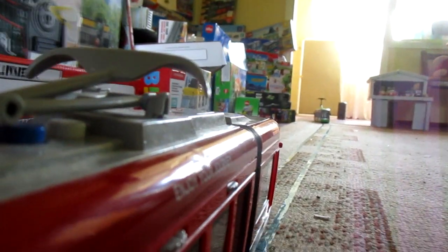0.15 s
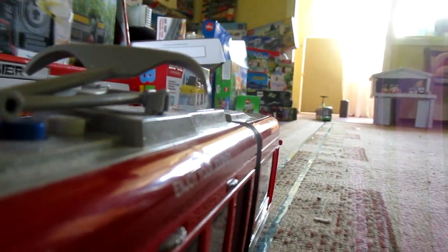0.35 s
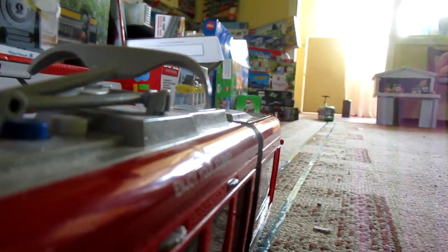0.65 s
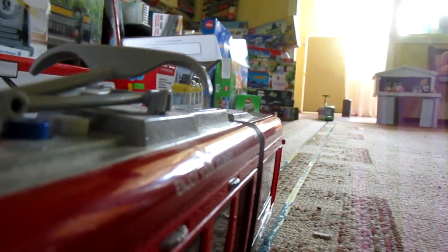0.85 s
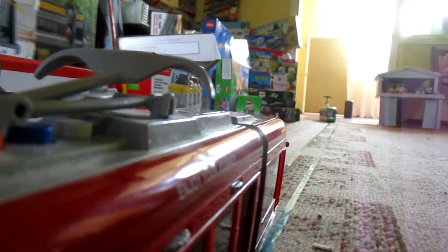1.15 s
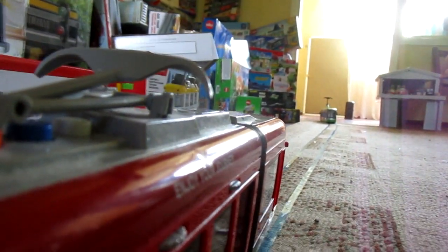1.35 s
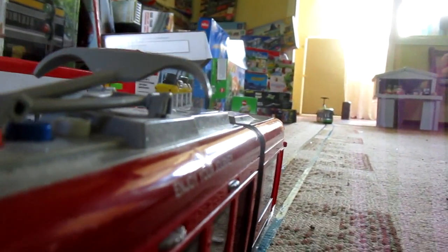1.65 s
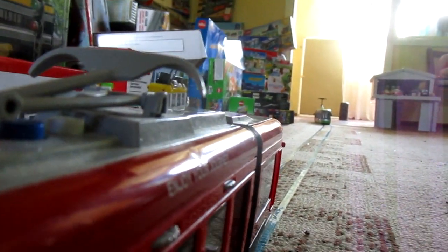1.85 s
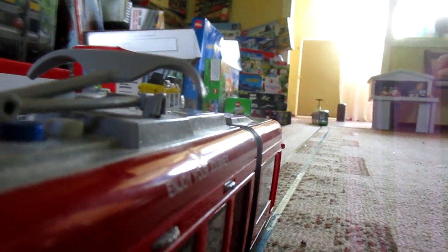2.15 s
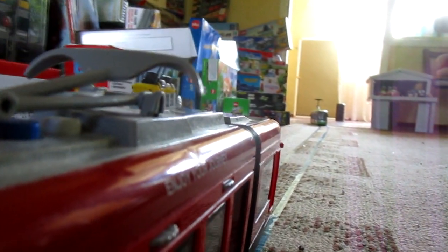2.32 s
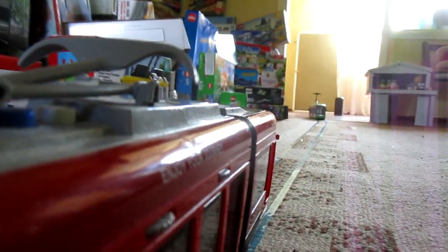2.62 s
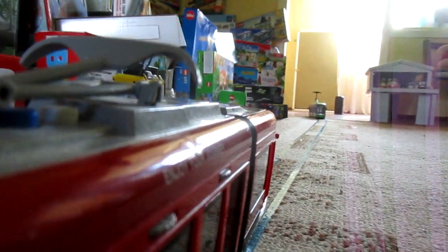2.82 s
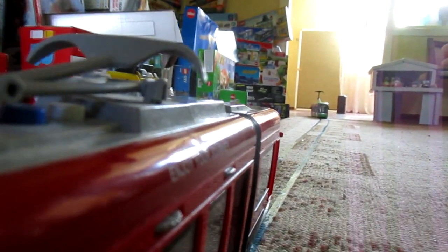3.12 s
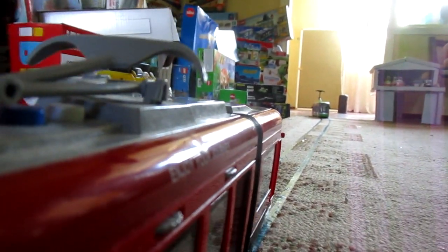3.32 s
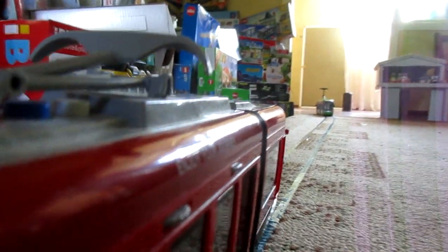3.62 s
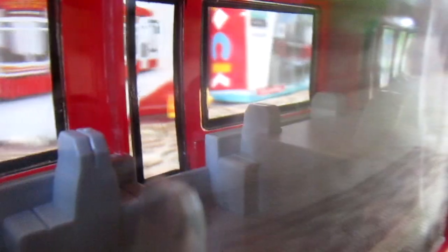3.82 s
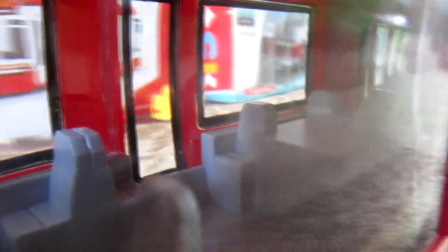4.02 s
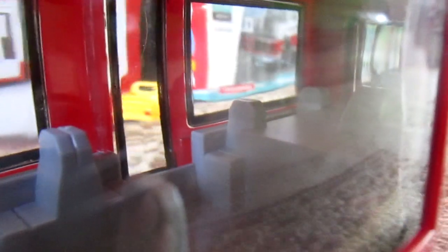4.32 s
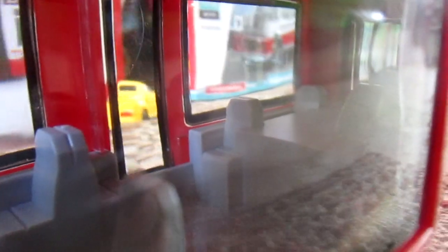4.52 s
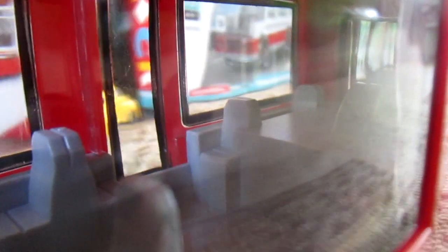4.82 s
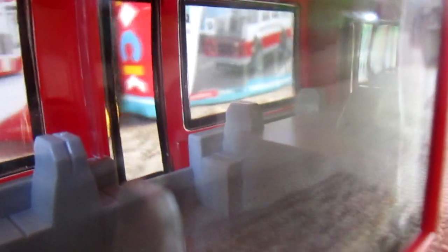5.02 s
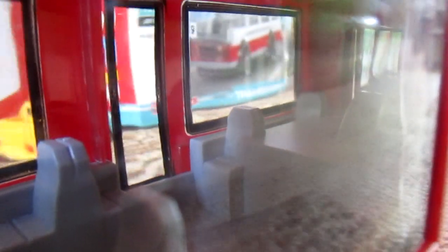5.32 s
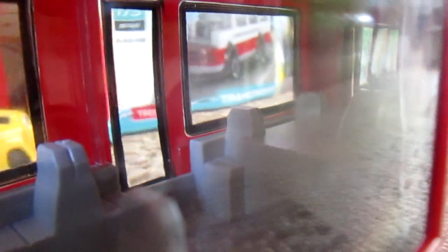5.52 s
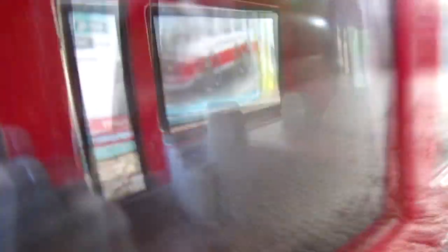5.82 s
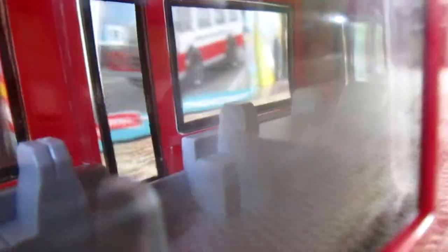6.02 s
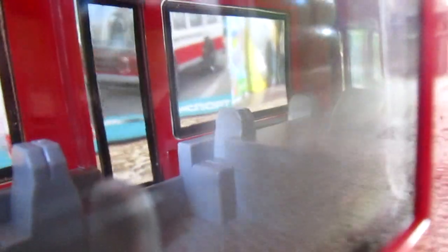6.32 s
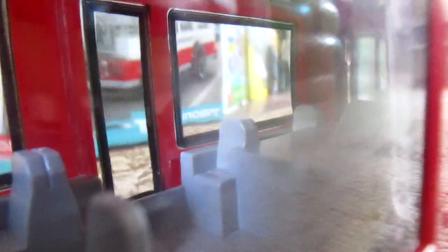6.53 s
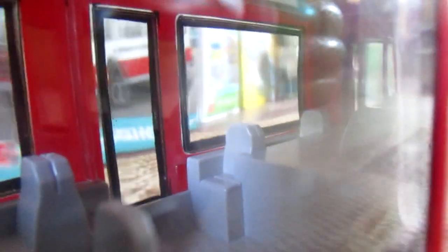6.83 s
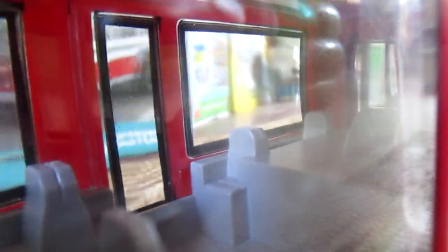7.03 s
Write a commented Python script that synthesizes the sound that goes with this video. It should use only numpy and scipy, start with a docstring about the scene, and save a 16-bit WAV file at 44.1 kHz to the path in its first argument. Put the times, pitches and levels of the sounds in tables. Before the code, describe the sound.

Gritty small-motor whirring winds down with light wheel knocks, cuts to silence, then returns closer and hollower, rising in pitch amid hard plastic snaps.

```python
"""Battery toy tram on its track

A toy tram runs along its track on a playroom carpet, heard from its roof, then, after a short silence, from inside.
The motor scrapes once a turn, rings the gearbox and whines with overtones of its shaft, all louder at speed.
Gritty rolling rings the plastic shell, a low rumble lies below, and wheels knock on the rails as decaying tones.
Loose plastic snaps as short noise cracks, the body bumps and swings against the microphone riding on it,
and plastic rubs once with a gritty noise. A faint hiss lies under both rides, and the gain drops after loud blows."""
import sys
import numpy as np
from scipy import signal
from scipy.fft import rfft, irfft
from scipy.io import wavfile
from scipy.ndimage import map_coordinates

SR = 44100
rng = np.random.default_rng(int(sys.argv[2]) if len(sys.argv) > 2 else 0)


def dump_mix(stems):
    """Bounce the given channels to the path in sys.argv[1] as a 16-bit WAV at rate SR."""
    frames = np.atleast_2d(stems).T  # one column per channel
    limited = np.clip(frames, -1, 1)  # hard clip at full scale
    pcm = np.round(limited * 32767).astype(np.int16)
    wavfile.write(sys.argv[1], SR, pcm)


N = 315752
T = np.arange(N) / SR  # time of each sample [s]
AXLE_TEETH = 8  # the motor shaft turns this many times per turn of the axle

# colour of the plastic shell heard from the roof: (frequency [Hz], level [dB])
ROOF_SHELL = [(150, -32), (250, -7.5), (323, 0), (417, -3.5), (573, -0.5), (731, -8.5), (835, -3.5),
              (932, -10.5), (1380, -3.5), (1890, -10), (2470, -4), (2630, -5), (2900, -20.5), (4280, -20),
              (4600, -28), (5980, -54), (10100, -120)]
# colour of the plastic shell heard from inside: (frequency [Hz], level [dB])
CABIN_SHELL = [(150, -49), (250, -3.5), (438, -4), (477, -5), (573, 4.5), (624, -3), (796, -12.5),
               (1020, -7.5), (1260, -11), (1450, -2), (1800, -17), (2440, -4.5), (3110, -19), (3830, -14),
               (4600, -38), (5980, -56), (10100, -120)]


def roof():
    """From the roof: slow, distinct gear ticks and a thin whine as the tram winds down."""
    # motor speed, cruising and then winding down: (time [s], speed [shaft turns per second])
    spin = [(0.0, 111), (0.2, 113), (0.79, 100.0), (0.99, 100), (1.33, 109), (1.44, 109), (1.92, 92.2),
            (2.57, 91.4), (2.74, 83.9), (3.33, 47.6), (3.46, 44.6), (3.57, 44.2)]
    # broad colour of the motor scrape: (frequency [Hz], level [dB])
    motor_colour = [(1880, -38), (3200, -8), (4300, -14), (4570, -20), (4860, -50.5), (5160, -12.5),
                    (6110, -0.5), (6990, -6), (7730, -2.5), (8160, 5), (9460, -9), (10400, -7),
                    (12900, -21.5), (14500, -9), (16000, -28)]
    # narrow resonances of the gearbox: (frequency [Hz], width [Hz], level [dB])
    gear_modes = [(5910, 63, -37), (6460, 89, 4.5), (7950, 87, -3), (7500, 40, 1), (8740, 40, 7.5),
                  (9500, 240, 7.5), (9570, 130, -23), (10750, 270, 10.5), (12300, 620, 12.5),
                  (13560, 170, -13.5)]
    # bands that surge once per axle turn: (frequency [Hz], width [Hz], swing [dB], strongest at [gear tooth])
    surge_bands = [(6200, 600, 6.5, 3.2), (7800, 800, 3.5, 0.65), (14000, 2000, 4.5, 3.5)]
    # overtones of the motor whine: (multiple of the shaft rate [-], level [dB])
    overtones = [(22, -4), (23, -2.5), (24, -6.5), (25, -6.5), (26, -1.5), (27, -3)]
    cruise_hz = 100  # shaft turns per second
    hz, = curves(spin)
    turns = np.cumsum(hz) / SR

    scrape = motor(turns, decay=.24, rest=.33, load_swing_db=6)
    gears = gearbox(scrape, turns, motor_colour, gear_modes, ring_db=-7.0)
    gears = surge(gears, turns, surge_bands)
    rolling = wheels(hz, ROOF_SHELL, spread_db=1.5, flutter_db=1.)
    tone = unit(colour(whine(hz, overtones), ROOF_SHELL))

    ride = rumble(hz)
    ride += gears * with_speed(hz, cruise_hz, cruise_db=-50.5, doubling_db=11.5)
    ride += rolling * with_speed(hz, cruise_hz, cruise_db=-44.5, doubling_db=2.5)
    ride += tone * with_speed(hz, cruise_hz, cruise_db=-55.5, doubling_db=12)
    return ride


def cabin():
    """From inside: the motor is closer and climbs to a whirr, and the hollow body hums."""
    # motor speed, climbing in two pushes: (time [s], speed [shaft turns per second])
    spin = [(3.93, 138.4), (4.14, 125.6), (4.47, 128.0), (4.68, 146.6), (4.89, 162.0), (4.96, 172.4),
            (5.28, 190.5), (5.64, 191.8), (5.69, 184.3), (6.44, 231.9), (6.59, 228.5), (6.72, 242.7),
            (6.83, 246.9), (7.16, 245.5)]
    # broad colour of the motor scrape: (frequency [Hz], level [dB])
    motor_colour = [(1880, -36), (3200, -19.5), (4000, -6), (4510, -2), (4790, -58), (5270, -2),
                    (5830, -1.5), (6190, 10), (6670, -16), (8500, 1.5), (9920, -0.5), (10800, 1.5),
                    (12000, -10.5), (15000, -3.5), (16000, -9)]
    # narrow resonances of the gearbox: (frequency [Hz], width [Hz], level [dB])
    gear_modes = [(5850, 19, 8), (5960, 19, -21), (6900, 110, 16), (7200, 53, 3), (7390, 50, 11),
                  (7980, 140, 10), (8490, 34, 2.5), (8710, 40, 5.5), (9390, 54, -13), (9800, 79, -8),
                  (10500, 37, 0.5), (12800, 82, 1), (13800, 120, -14), (15200, 130, -13)]
    # bands that surge once per axle turn: (frequency [Hz], width [Hz], swing [dB], strongest at [gear tooth])
    surge_bands = [(7400, 390, 5, 1.3), (8500, 640, 2.6, 3.9)]
    # overtones of the motor whine: (multiple of the shaft rate [-], level [dB])
    overtones = [(2, -4), (6, -1), (7, -2), (8, -1), (9, -4), (10, -1.5), (11, -3), (12, -9), (13, -7),
                 (14, -7), (15, -5), (16, -21), (18, -11), (19, -11)]
    # resonances of the hollow cabin: (frequency [Hz], width [Hz], level [dB])
    air_modes = [(556, 34, 2.5), (590, 35, -1), (1036, 41, -15), (1406, 39, 0.5), (1472, 34, -4),
                 (2500, 51, -17)]
    # overtones favoured by the cabin wall: (frequency [Hz], width [Hz], level [dB])
    wall_modes = [(2360, 520, 4), (3400, 350, 2)]
    cruise_hz = 200  # shaft turns per second
    hz, = curves(spin)
    turns = np.cumsum(hz) / SR

    scrape = motor(turns, decay=.3, rest=.47, load_swing_db=5)
    gears = gearbox(scrape, turns, motor_colour, gear_modes, ring_db=1)
    gears = surge(gears, turns, surge_bands)
    rolling = wheels(hz, CABIN_SHELL, spread_db=1.5, flutter_db=2.5)
    hum = unit(resonate(rng.standard_normal(N), air_modes))
    tone = whine(hz, overtones)
    tone = unit(tone + resonate(tone, wall_modes))

    ride = rumble(hz)
    ride += gears * with_speed(hz, cruise_hz, cruise_db=-44.5, doubling_db=8.5)
    ride += rolling * with_speed(hz, cruise_hz, cruise_db=-41, doubling_db=4.5)
    ride += hum * with_speed(hz, cruise_hz, cruise_db=-47.5, doubling_db=15)
    ride += tone * with_speed(hz, cruise_hz, cruise_db=-49, doubling_db=10.5)
    return ride


def with_speed(hz, cruise_hz, cruise_db, doubling_db):
    """Gain of a running noise: its level at cruising speed, plus a step for each doubling of speed."""
    return undb(cruise_db + doubling_db * np.log2(hz / cruise_hz))


def motor(turns, decay, rest, load_swing_db):
    """The worm scrapes once a turn (decay in turns); the eight-toothed axle gear loads it unevenly."""
    phase, tooth = turns % 1, turns.astype(int)
    burst = (1 - np.exp(-phase / .06)) * np.exp(-phase / decay)
    # the load eases over one turn of the axle, and no two bites are quite alike
    bite_db = rng.standard_normal(tooth[-1] + 1)[tooth]
    load_db = load_swing_db * (.5 - tooth % AXLE_TEETH / AXLE_TEETH) + bite_db
    # the same rough surfaces meet again on every turn of the axle
    axle_place = turns % AXLE_TEETH / AXLE_TEETH
    surface = np.interp(axle_place, np.linspace(0, 1, 4096), rng.standard_normal(4096))
    friction = 1.54 * unit(surface) + rng.standard_normal(N)
    return unit(friction * (unit(burst) + rest) * undb(load_db))


def gearbox(scrape, turns, broad, modes, ring_db):
    """The scrape rings the gearbox; as the axle turns, the contact moves and each resonance swells in its turn."""
    axle = 2 * np.pi * turns / AXLE_TEETH
    body = unit(colour(scrape, broad))
    ring = np.zeros(N)
    for mode in modes:
        swell_db = 3 * np.cos(axle + 2 * np.pi * rng.random())
        ring += resonate(body, [mode]) * undb(swell_db)
    # a second path, half a millisecond longer, slides with the axle and ripples the colour
    lag = SR * (.00051 + .00003 * np.sin(axle))
    second = map_coordinates(body, [np.arange(N) - lag], order=3)
    return unit(unit(body + 0.3 * second) + undb(ring_db) * unit(ring))


def surge(x, turns, bands):
    """Bands of the scrape swell and fade, each at its own point in the turn of the axle."""
    for hz, width, swing_db, tooth in bands:
        gain = undb(swing_db * np.cos(2 * np.pi * (turns - tooth) / AXLE_TEETH))
        x = x + (gain - 1) * resonate(x, [(hz, width, 0)])
    return unit(x)


def whine(hz, overtones):
    """Overtones of the shaft, wavering a little in pitch and strength."""
    waver, flicker_db = .0016, 3  # share of the pitch, strength of each overtone
    turns = np.cumsum(hz * (1 + waver * walk(60))) / SR
    tone = np.zeros(N)
    for multiple, db in overtones:
        gain = undb(db + flicker_db * walk(30))
        tone += gain * np.sin(2 * np.pi * (round(multiple) * turns + rng.random()))
    return unit(tone)


def wheels(hz, shell, spread_db, flutter_db):
    """Rolling grit rings the shell; its lower and upper resonances flutter separately."""
    ring = colour(grit(hz, spread_db, smooth=0.98), shell)
    low = band(ring, 900, "low")
    high = band(ring, 980, "high")
    # the two filters are in opposite phase where they meet, hence the minus
    return unit(low * undb(flutter_db * walk(24)) - high * undb(flutter_db * walk(35)))


def rumble(hz):
    """The whole body trembles on its wheels: low-pitched grit whose level hardly follows the speed."""
    # colour of the trembling: (frequency [Hz], level [dB])
    tremble_colour = [(12, -32), (20, -2.5), (54, 1), (102, 2.5), (140, -2), (173, -0.5), (204, -5.5),
                      (330, -10.5), (430, -29), (730, -120)]
    # loudness of the trembling: (time [s], level [dB])
    tremble_level = [(0, -50.5), (1.5, -48.5), (2.8, -48), (3.5, -48.5), (4.05, -45.5), (4.43, -51.5),
                     (5.1, -45.5), (5.6, -48.5), (7.15, -46.5)]
    level_db, = curves(tremble_level)
    return unit(colour(grit(hz, 3.9, smooth=1.7), tremble_colour)) * undb(level_db)


def grit(hz, spread_db, smooth):
    """Tiny impacts of uneven size, more of them at speed, over a smooth hiss."""
    hits = rng.random(N) < 20 * hz / SR  # about 20 per turn
    size_db = spread_db * np.minimum(rng.exponential(size=N), 4)
    grains = hits * rng.choice([-1, 1], N) * undb(size_db)
    return unit(unit(grains) + smooth * rng.standard_normal(N))


def knocks():
    """The hardest knocks of the wheels on the rails; each wheel drops back once with a weak rebound."""
    # the knocks: (time [s], peak level [dB], bass share [dB], treble share [dB])
    hard_knocks = [(0.134, -26.5, -10, 9), (0.156, -26.5, 24, -5), (0.238, -29, -12, 3),
                   (0.358, -24, 6, -12), (0.493, -27.5, -6, -9), (1.298, -29.5, 1, -5), (1.393, -23, 8, 4),
                   (1.407, -24, 12, 1), (1.817, -24, 8.5, 6), (1.966, -27.5, 12, -5), (2.224, -28, 10, 0),
                   (2.538, -25, 8.5, -7), (2.812, -12, -1.5, -20), (3.052, -32, -1, 1), (3.108, -29, 5, -1),
                   (3.142, -26, 2, -12), (3.235, -26, -5, -13), (3.404, -20, 3, -18.5),
                   (3.937, -26, -2, -4), (4.082, -23, 10, -5), (4.42, -27, 2, -9), (4.547, -27, 5, -7),
                   (5.424, -31, -4, -5), (5.71, -23.5, 11, 15), (6.295, -20.5, 7, -5),
                   (6.864, -21.5, -2, -9)]
    out = np.zeros(N)
    for s, peak_db, bass_db, treble_db in hard_knocks:
        add(out, s, knock(bass_db, treble_db), peak_db)
        rebound_s = s + 0.012 * rng.uniform(0.52, 1.6)
        add(out, rebound_s, knock(bass_db, treble_db), peak_db - 14)
    return out


def jolts():
    """Light knocks at random moments, with random strength."""
    per_s, middle_db, spread_db = 6, -35.5, 8.5  # peak level lies within middle +- spread
    out = np.zeros(N)
    for place, strength in rng.random((int(per_s * N / SR), 2)):
        peak_db = middle_db + spread_db * (2 * strength - 1)
        add(out, place * T[-1], knock(bass_db=6.5, treble_db=-3.5), peak_db)
    return out


def knock(bass_db, treble_db):
    """One knock rings the chassis modes in its own mix, with a short rattle of the shell."""
    # what the chassis rings with: (frequency [Hz], level [dB], time to fall by 60 dB [s])
    chassis_modes = [(482.5, -5.5, 0.084), (633, 2.5, 0.045), (816, -3.5, .035), (1044, 3.5, 0.03),
                     (1242, 9, 0.029), (1493, -6.5, 0.045), (1590, 6, 0.037), (1775, 3, 0.027),
                     (2064, 2, 0.039), (2600, -34, .02), (3300, -16, 0.059)]
    t = T[:SR // 10]
    hz, db, t60 = np.transpose(chassis_modes)[:, :, None]
    detune, strength, polarity = rng.standard_normal((3, len(hz), 1))
    share_db = bass_db * (hz < 950) + treble_db * (hz > 2000)
    gain = np.sign(polarity) * undb(db + 2 * strength + share_db)
    swing = np.sin(2 * np.pi * hz * (1 + .015 * detune) * t)
    ring = np.sum(gain * undb(-60 * t / t60) * swing, axis=0)
    rattle = unit(colour(rng.standard_normal(len(t)), ROOF_SHELL)) * np.exp(-t / 0.0049)
    # a wheel rolls into the joint, so the blow builds up over a moment
    return (ring + 1.5 * rattle) * (1 - np.exp(-t / 0.00041))


def snaps():
    """Hard contacts of loose plastic: a sharp crack of noise that dies within milliseconds."""
    # the snaps: (time [s], peak level [dB], middle share [dB], top share [dB])
    snap_times = [(0.133, -29.5, 26, -6), (0.239, -38, 3, -6), (2.342, -30, -19, 2), (2.8121, -21, 7, -10),
                  (4.062, -24, 6, 6), (4.081, -18, 3, -5), (4.171, -31, -3, -3), (4.9735, -17.5, -2, 9.5),
                  (5.57, -17.5, -6, -8), (5.7334, -3.5, -4, 6), (5.738, -10.5, 19, -10),
                  (5.9346, -8.5, 14.5, -9), (5.9639, -16.5, 4, 12), (6.265, -20.5, 1, -2),
                  (6.374, -17, 6, 12), (6.656, -24, 5, 12), (6.761, -22, 0, 8), (7.09, -25, -5, 7)]
    # colour common to all snaps: (frequency [Hz], level [dB])
    snap_colour = [(400, 7.5), (1400, 1), (2300, 3), (2900, -7), (3600, 4.5), (4400, -7.5), (4850, -14.5),
                   (5500, -9.5), (7500, 0), (10000, -3), (13000, -14.5), (16000, -16.5)]
    out, t = np.zeros(N), T[:SR // 12]
    for s, peak_db, middle_db, top_db in snap_times:
        fade = undb(-60 * t / 0.018)  # falls by 60 dB in 18 ms
        crack = colour(rng.choice([-1, 1], len(t)) * fade, snap_colour)
        tilt = [(200, middle_db), (3500, middle_db), (6000, 0.003), (9500, 0),
                (11500, top_db), (16000, top_db)]
        add(out, s, colour(crack, tilt), peak_db)
    return out


def bumps():
    """Each contact sets off heavily damped swings of the body against the microphone; the shell rattles with it."""
    # the bumps, peak before the last low cut; a heavy contact keeps leaning on the microphone:
    # (time [s], peak level [dB], contact [s], lean [0-1])
    contacts = [(3.953, -31, .008, .5), (4.009, -27, 0.0036, .4), (4.048, -27, 0.0027, 0.2),
                (4.080, -17, 0.0026, .7), (5.7342, 0, .003, 0.12), (5.815, -25, 0.0015, .05),
                (5.8992, -16.5, 0.0022, 0.34), (5.9358, -7, .0045, .95), (6.289, -15, 0.0035, 0.34),
                (6.870, -31.5, 0.0073, .3)]
    # what the body rings with: (frequency [Hz], level [dB], time to fall by 60 dB [s])
    body_modes = [(52, -8.5, 0.06), (120, -11, 0.042), (186, -3, 0.017), (269, 8.5, 0.015), (448, 0, .016),
                  (540, -5, 0.04), (610, -11, 0.029)]
    out, t = np.zeros(N), T[:SR // 8]
    ring = sum(undb(db - 60 * t / t60) * np.cos(2 * np.pi * hz * t) for hz, db, t60 in body_modes)
    for s, peak_db, contact_s, lean in contacts:
        phase = np.pi * np.minimum(t / contact_s, 1)
        # a push-and-pull swing, blended with a one-way push when leaning
        push = (1 - lean) * np.sin(2 * phase) + lean * np.sin(phase)
        rattle = colour(rng.standard_normal(len(t)) * np.exp(-t / 0.0064), CABIN_SHELL)
        add(out, s, signal.fftconvolve(ring, push)[:len(t)], peak_db)
        add(out, s, rattle, peak_db - 15)
    return band(out, hz=39.6, kind="high")


def rub():
    """A brief gritty slide of plastic: it catches hard, then slides on lightly."""
    # colour of the slide: (frequency [Hz], level [dB])
    slide_colour = [(500, -6), (1500, -9), (3600, 4), (4800, -5), (6500, 4.5), (9000, -5), (14000, -9),
                    (16000, -19)]
    start_s, end_s = 6.288, 6.445
    attack_s, release_s, catch_s = 0.014, .025, 0.03
    catch_db, slide_db, flutter_db = -31, -42.5, 0.5
    slide = unit(colour(grit(230, spread_db=1, smooth=0.85), slide_colour))
    age = np.maximum(T - start_s, 0)
    contact = np.clip(np.minimum(age / attack_s, (end_s - T) / release_s), 0, 1)
    force = undb(catch_db) * np.exp(-age / catch_s) + undb(slide_db)
    return slide * contact * force * undb(flutter_db * walk(90))


def hiss():
    """Smooth, faint treble hiss: coloured noise at a steady level."""
    # colour of the hiss: (frequency [Hz], level [dB])
    hiss_colour = [(1760, -32.5), (3000, -9), (4200, -16.5), (4760, -29), (5040, -7), (6570, -3.5),
                   (11000, -6.5), (13400, -13.5), (16000, -27.5)]
    return unit(colour(rng.standard_normal(N), hiss_colour)) * undb(-61)


def undb(db):
    """Decibels to gain."""
    return 10 ** (np.asarray(db) / 20)


def unit(x):
    """Scale to rms 1."""
    return x / np.sqrt(np.mean(x ** 2))


def curves(table):
    """Each column of a table after the time, joined by straight lines."""
    s, *columns = np.transpose(table)
    return [np.interp(T, s, c) for c in columns]


def colour(x, points):
    """Causal filter with the gain of (Hz, dB) points, falling 24 dB per octave beyond their ends."""
    size = 4096
    hz, db = np.transpose(points)
    octave = np.log2(np.maximum(np.arange(size // 2 + 1) * SR / size, 1))
    known = np.log2(hz)
    beyond = np.abs(octave - np.clip(octave, known[0], known[-1]))
    gain_db = np.interp(octave, known, db) - 24 * beyond
    # folding the cepstrum makes the filter respond as early as it can (minimum phase)
    cepstrum = irfft(np.log(undb(gain_db) + 1e-4))
    cepstrum[1:size // 2] *= 2
    cepstrum[size // 2 + 1:] = 0
    response = irfft(np.exp(rfft(cepstrum)))
    return signal.fftconvolve(x, response)[:len(x)]


def band(x, hz, kind):
    """Gentle low-pass or high-pass."""
    return signal.sosfilt(signal.butter(2, hz, kind, fs=SR, output="sos"), x)


def resonate(x, modes):
    """Ring a set of (Hz, width Hz, dB) resonances side by side."""
    out = np.zeros(len(x))
    for hz, width, db in modes:
        b, a = signal.iirpeak(hz, hz / width, fs=SR)
        out += undb(db) * signal.lfilter(b, a, x)
    return out


def walk(rate):
    """Smooth chance, spread a little under 1, changing direction about rate times a second."""
    return np.interp(T * rate, np.arange(2048), rng.standard_normal(2048))


def add(out, s, sound, db):
    """Mix a sound in at time s with the given peak level."""
    i = max(int(s * SR), 0)
    out[i:i + len(sound)] += (sound * undb(db) / np.abs(sound).max())[:N - i]


def heard(start_s, end_s):
    """One inside the span and zero outside, with 3 ms ramps."""
    return np.clip(np.minimum(T - start_s, end_s - T) / .003, 0, 1)


def gain_control(x):
    """A peak over the threshold turns the gain down; it creeps back at a steady rate."""
    threshold_db, attack_s, recovery_db_per_s = -5, 0.012, 9
    level_db = 20 * np.log10(np.clip(np.abs(x), 1e-9, 1))
    over_db = np.maximum(level_db - threshold_db, 0)
    recovery_db = recovery_db_per_s * T
    held_db = np.maximum.accumulate(over_db + recovery_db, axis=-1) - recovery_db
    keep = np.exp(-1 / (attack_s * SR))
    return x * undb(-signal.lfilter([1 - keep], [1, -keep], held_db))


def scene():
    """Two rides with silence between them, and the blows along the way."""
    on_roof, inside = heard(-.01, 3.579), heard(3.928, 7.2)
    rides = roof() * on_roof + cabin() * inside
    blows = bumps() + snaps() + rub() + knocks()
    background = (hiss() + jolts()) * (on_roof + inside)
    return (rides + blows + background)[None]


def record(dry):
    """The gain drops after a loud blow, peaks clip at full scale and the top is cut above 15.9 kHz."""
    clipped = np.clip(gain_control(dry), -1, 1)
    top_cut = signal.ellip(10, .2, 80, 15900, fs=SR, output="sos")
    return signal.sosfilt(top_cut, clipped)


dry = scene()
out = record(dry)
dump_mix(out)
```